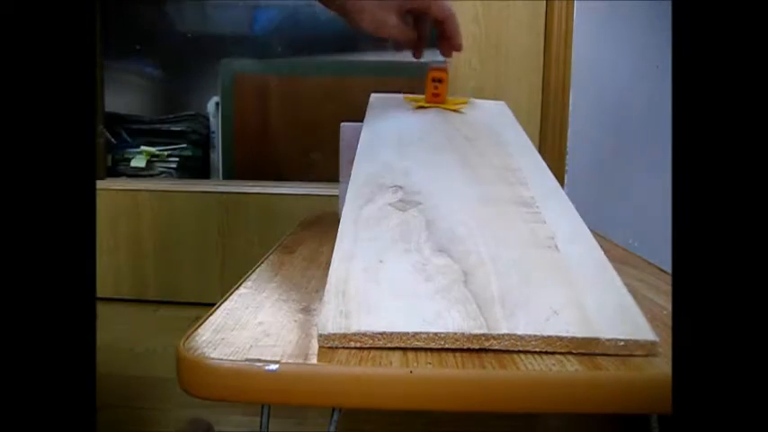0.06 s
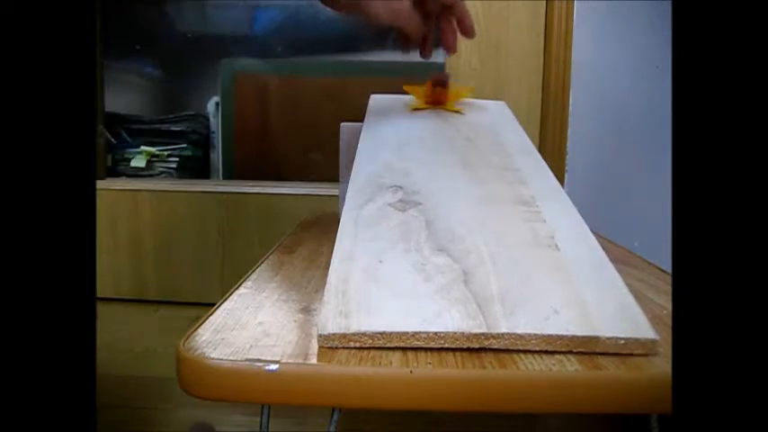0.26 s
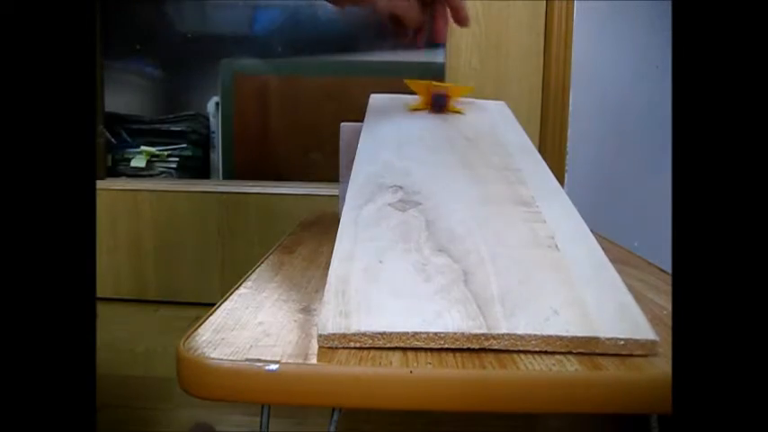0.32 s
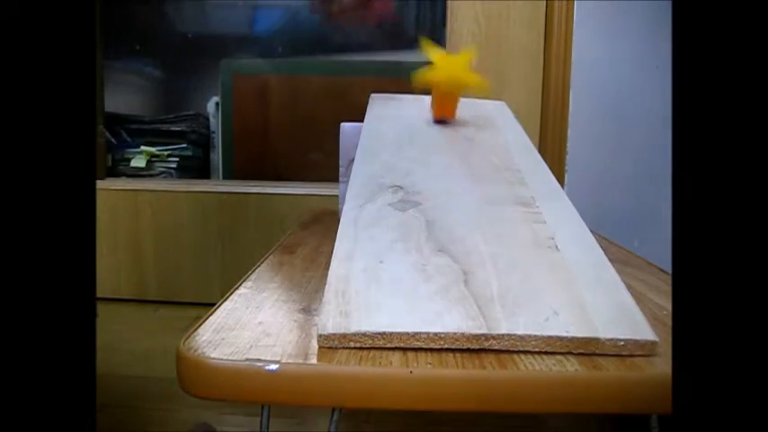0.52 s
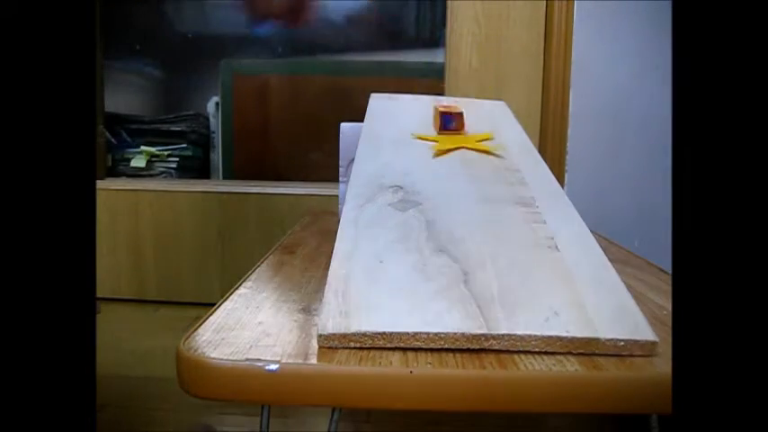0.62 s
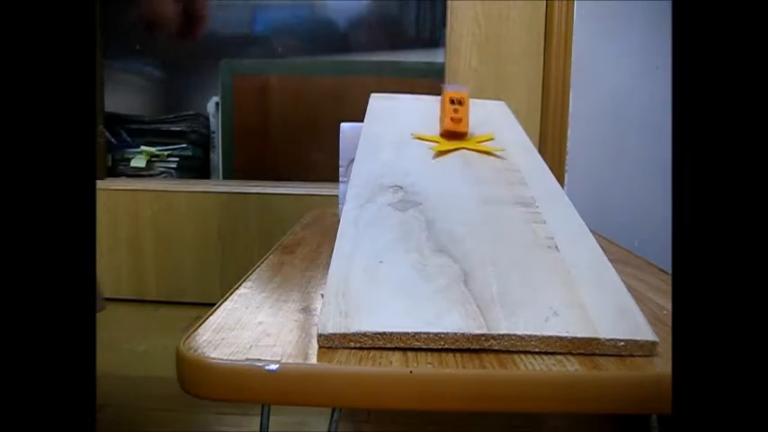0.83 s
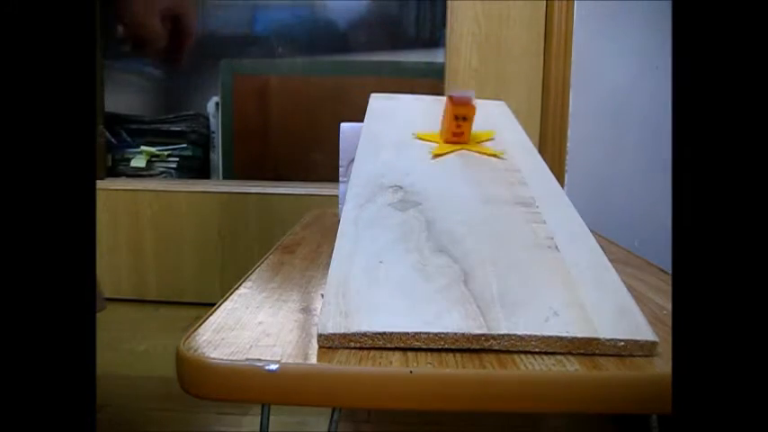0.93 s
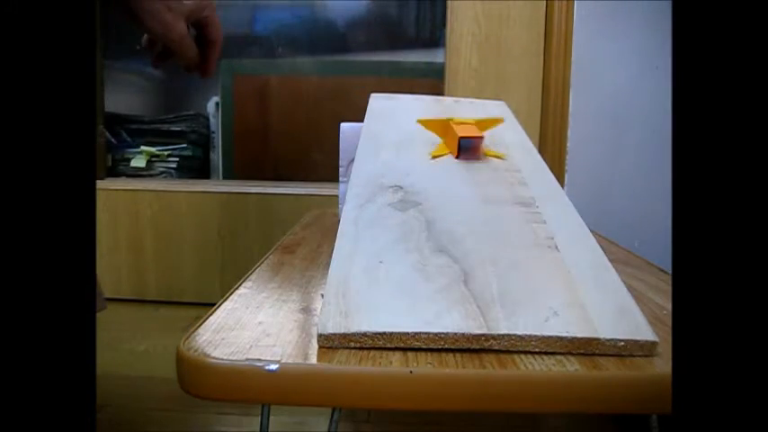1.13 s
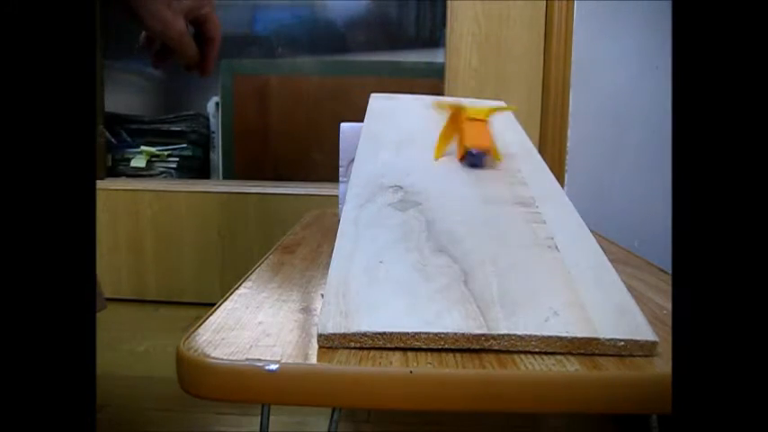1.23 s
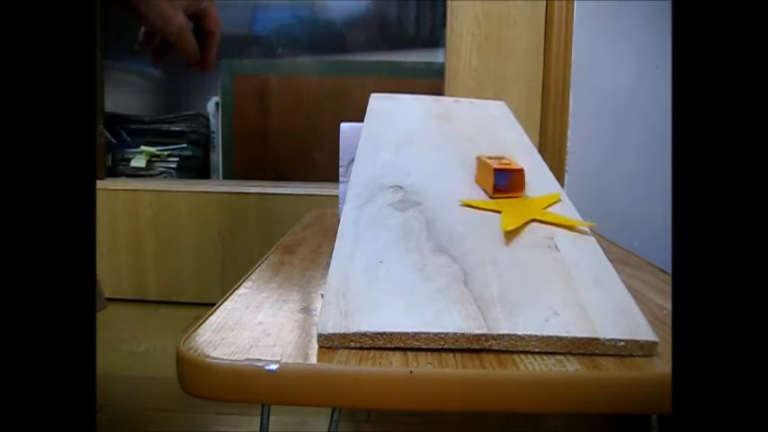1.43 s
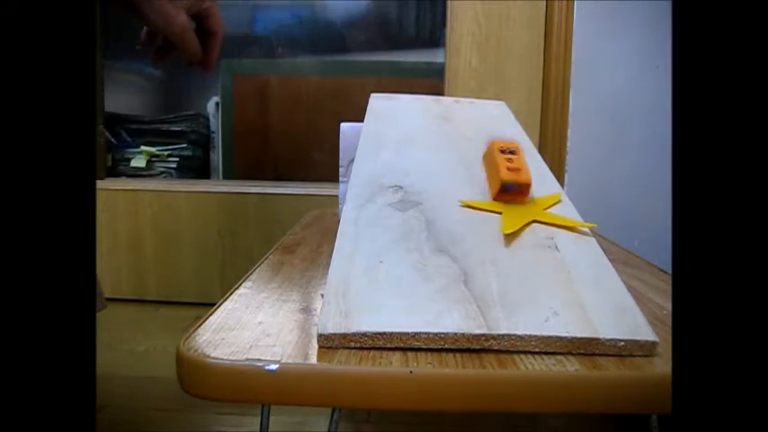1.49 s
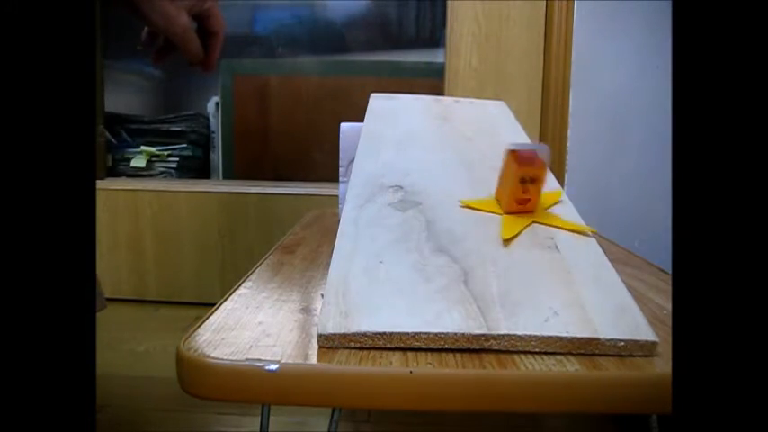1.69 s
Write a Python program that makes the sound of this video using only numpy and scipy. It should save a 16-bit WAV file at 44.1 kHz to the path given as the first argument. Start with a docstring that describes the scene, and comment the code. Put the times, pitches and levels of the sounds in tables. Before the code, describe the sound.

A little plastic toy clatters end over end down a wooden board in two uneven bursts of sharp clicks and woody knocks, with weaker taps and brief scrapes following each. Heard close up in a quiet room with low hum.

```python
"""Toy tumbling down a board

A quiet room, one microphone close to a wooden board. A small plastic toy tumbles down it end over end:
its hard edges click, its body lands and rings the wood, its weight shifts with dull bumps, and between
landings it scrapes a little. Behind it are a short room tail, a low hum and a faint whine."""
import sys
import numpy as np
from scipy import signal
from scipy.fft import rfft, irfft
from scipy.io import wavfile
from scipy.ndimage import map_coordinates

SR = 44100
rng = np.random.default_rng(int(sys.argv[2]) if len(sys.argv) > 2 else 0)


def unload_wav(signal):
    """Save mono or channel-first audio to the path in sys.argv[1] as 16-bit WAV at rate SR, clipped to [-1, 1]."""
    wavfile.write(
        sys.argv[1],
        SR,
        np.round(np.clip(np.atleast_2d(signal).T, -1, 1) * 32767).astype(np.int16),
    )


N = 77175
T = np.arange(N) / SR

# spectrum of the room tone: frequency_hz, gain_db
AIR_SPECTRUM = [(15, 6.5), (25, -10), (117, -2.5), (384, -12), (560, -9.5), (800, -12.5), (1160, -13.5),
                (1500, -14), (4370, -20.5), (11000, -21), (16000, -38)]
# the hum and the whine: centre_hz, width_hz, level_db
HUM_BANDS = [(116.5, 30.3, -49.5), (1318, 102, -55)]
# the room's tail by band: low_hz, high_hz, gain_db, t60_s
ROOM_TAIL = [(97, 350, -4.5, 0.96), (423, 1070, -3.5, 0.15), (1070, 1950, -9, 0.2), (2270, 5300, -10, 0.19),
             (5330, 11700, -9.5, 0.21)]
# the toy slides: start_s, length_s, level_db, treble_db
SLIDES = [(0.125, 0.1, -53, 0), (0.357, 0.042, -39.5, -9), (0.478, 0.21, -47.5, 0.5),
          (0.914, 0.013, -41, -4.5), (1.132, 0.034, -40.5, -9), (1.236, 0.15, -46.5, 7.5),
          (1.385, 0.03, -41, 3.5), (1.676, 0.045, -50.5, 1)]
# spectrum of plastic rubbing on wood: frequency_hz, gain_db
SLIDE_SPECTRUM = [(200, -16), (1000, -7), (3000, 6.5), (6500, -1.5), (11000, -0.5), (13000, -10),
                  (16000, -26)]
# the fingers let go and the toy rocks on the board: start_s, level_db, t60_s
ROCKINGS = [(0.180, -35, 0.062), (0.203, -44.5, 0.071), (0.237, -35, 0.1), (0.363, -44, 0.14),
            (1.229, -41, 0.12), (1.403, -48, 0.28)]
# spectrum of a dull bump: frequency_hz, gain_db
BUMP_SPECTRUM = [(40, -10), (100, -5), (220, 4.5), (320, -7.5), (430, -5.5), (1500, -31), (4000, -84)]
# the body lands, a harder contact having a higher corner: start_s, level_db, corner_hz, low_modes_db
LANDINGS = [(.1795, -42.5, 900, 5.5), (0.2371, -16.5, 2720, -6.5), (.2665, -58, 1430, 16),
            (.291, -48.5, 1190, 20), (.363, -34, 1160, -3), (.4610, -15, 1890, 0.5),
            (.4773, -30.5, 980, -2.5), (.554, -35.5, 1360, -4.5), (.590, -38.5, 1830, -0.5),
            (.630, -35.5, 2390, -2.5), (1.1465, -52, 1000, 1), (1.2285, -20, 1130, -4.5),
            (1.2443, -27.5, 1035, -3.5), (1.407, -32, 1920, -9)]
# where the toy touches along the board: time_s, position_m
TOY_PATH = [(.24, .297), (.46, .373), (1.23, .408), (1.41, .495)]
# the board's main modes: pitch_hz, gain_db, t60_s
BOARD_MODES = [(223, -32, 0.18), (254.3, -21, 0.38), (456, -10.5, 0.24), (492.6, -16, 0.45),
               (639, -14.5, 0.105), (709, -1, 0.11), (791, -8.5, 0.18), (854, -8.5, 0.15), (968, 4.5, 0.11),
               (1024, -11.5, 0.18), (1330, -10, 0.15), (1470, 9.5, 0.054), (1854, -4, 0.075),
               (2122, 12.5, 0.04)]
# spectrum of the board's crowd of weak modes: frequency_hz, gain_db
CROWD_SPECTRUM = [(150, -22), (400, -16.5), (720, 1.5), (1150, -5), (1500, -12), (3300, -0.5), (6000, -6.5),
                  (16000, -42)]
# hard edges tap the wood: start_s, level_db, treble_db, contact_s, pitch_ratio
EDGE_TAPS = [(0.13, -39, -12.5, 0.0075, 1.15), (0.1466, -32, -4.5, 0.0012, 0.98),
             (0.238, -22.5, -22.5, 0.0023, 1.095), (0.3597, -34.5, 0, 0.0032, 0.78),
             (0.4092, -34.5, -3, 0.00066, 0.92), (0.436, -10.5, -2, 0.0007, 1.01),
             (0.447, -22, -8, 0.00066, 1.1), (0.4765, -27.5, -13, 0.0026, 0.89),
             (0.4854, -28.5, -11, 0.0028, 1.05), (.617, -40, -24, 0.0089, .95),
             (0.6285, -34, -32, 0.0036, 1.2), (.6345, -26.5, -16, 0.0023, 1),
             (0.6950, -26.5, -1.5, 0.00177, 1.065), (0.9197, -32, -15, 0.0011, 1.23),
             (1.1463, -21.5, -18, 0.00066, 1.164), (1.179, -34.5, -2, 0.0014, 1.13),
             (1.207, -8, -6, 0.00044, 0.97), (1.2179, -31, -7, 0.0036, 0.98), (1.232, -28, -9, 0.005, 1),
             (1.2439, -25, -9, 0.003, 1.07), (1.2523, -20, -20, 0.0006, 1),
             (1.4030, -28.5, -32, 0.003, 1.5), (1.4067, -21.5, -26, 0.0025, 0.98),
             (1.4635, -27, -5, 0.0038, 1.08), (1.616, -46, -22, 0.0012, 1.42),
             (1.6921, -38.5, -3, 0.00088, 1.1), (1.7042, -37.5, -14, 0.00096, 1.1)]
# modes of the plastic shell: pitch_hz, gain_db, t60_s
SHELL_MODES = [(2747, 6, 0.0046), (3050, 0, 0.012), (3400, -22, 0.0077)]
# spectrum of the plastic's crack: frequency_hz, gain_db
CRACK_SPECTRUM = [(200, -23), (800, -3), (1200, -12.5), (2700, 3.5), (3900, -0.5), (6500, -0.5), (9000, 1),
                  (11000, 6), (13000, -4), (16000, -7.5)]

BEND_WAVELENGTH_M, NODE_DB = .1, 2.5  # board wavelength at 1 kHz; gain on a crest or loss on a node
CROWD_DB, CROWD_T60_S = -3, 0.091  # level relative to the main modes
LOW_MODES_HZ, TREBLE_HZ = 772, 6700  # centres of the bass and treble tilts
CRACK_DB = 4.5  # relative to the shell's ring
SHELL_LOW_HZ = 1120  # the clicks are cut below this


def undb(db):
    """Decibels to amplitude."""
    return 10 ** (np.asarray(db) / 20)


def level(x, db, size=N):
    """Scale x so that its first size samples have the given rms level."""
    return x * undb(db) / np.sqrt(np.mean(x[:size] ** 2) + 1e-18)


def fade(t60):
    """Decay that falls 60 dB in t60 seconds."""
    return np.exp(-np.log(1000) * T / max(t60, 1e-4))


def add(out, start_s, x):
    """Mix x into out from the given time on."""
    i = int(round(max(start_s, 0) * SR))
    out[i:i + len(x)] += x[:N - i]


def butter(x, hz, kind, order=2):
    """Butterworth filter."""
    return signal.sosfilt(signal.butter(order, np.clip(hz, 10, SR * .49), kind, fs=SR, output="sos"), x)


def colour(points, size=4096):
    """Minimum-phase impulse response with a spectrum of (frequency_hz, gain_db) points."""
    hz, db = np.array(points).T
    bins_hz = np.maximum(np.fft.rfftfreq(size, 1 / SR), 1)
    gain = undb(np.interp(np.log(bins_hz), np.log(hz), db))
    cepstrum = irfft(np.log(gain))
    cepstrum[1:size // 2] *= 2
    cepstrum[size // 2 + 1:] = 0
    return irfft(np.exp(rfft(cepstrum)))


def through(x, response):
    """Pass x through an impulse response, keeping its length."""
    return signal.fftconvolve(x, response)[:len(x)]


def ring(modes):
    """Decaying sines of a struck object; neighbouring pairs of modes swing in opposite directions."""
    return sum(undb(db) * fade(t60) * np.sin(2 * np.pi * hz * T) * (-1) ** (k // 2)
               for k, (hz, db, t60) in enumerate(modes))


def brighten(x, treble_db):
    """Tilt that lifts or lowers the treble."""
    tilt = [(TREBLE_HZ / 1.73, 0), (TREBLE_HZ * 1.73, treble_db), (TREBLE_HZ * 2.0, 1.3 * treble_db)]
    return through(x, colour(tilt))


def room_tone():
    """Steady room noise, with two narrow bands for the low hum and the faint whine."""
    out = level(through(rng.standard_normal(N), colour(AIR_SPECTRUM)), db=-48.5)
    for hz, width_hz, db in HUM_BANDS:
        band = butter(rng.standard_normal(N), [hz - width_hz / 2, hz + width_hz / 2], "band")
        out += level(band, db)
    return out


def room_reflections(direct, gap_s=0.0065, early_db=-12, early_t60_s=0.028):
    """The direct sound, quick reflections from the table and furniture, then a short diffuse tail."""
    def echoes(envelope):
        return rng.standard_normal(N) * envelope / np.sqrt(np.sum(envelope ** 2))

    early_rise = np.minimum(T / gap_s, 1)
    tail_rise = np.clip(T / gap_s - 1, 0, 1)
    response = undb(early_db) * echoes(early_rise * fade(early_t60_s))
    for low_hz, high_hz, db, t60 in ROOM_TAIL:
        response += undb(db) * butter(echoes(tail_rise * fade(t60)), [low_hz, high_hz], "band")
    return direct + through(direct, response)


def scrapes(rough_db=4.5, rough_hz=302):
    """Plastic slides over the wood grain with a fine, slightly uneven hiss."""
    out, tone = np.zeros(N), colour(SLIDE_SPECTRUM)
    for start_s, length_s, db, treble_db in SLIDES:
        size = int(length_s * SR)
        roughness = level(butter(rng.standard_normal(N), rough_hz, "low"), 0)
        friction = rng.standard_normal(N) * undb(rough_db * roughness)
        hiss = brighten(through(friction[:size], tone), treble_db)
        add(out, start_s, level(hiss * signal.windows.tukey(size, .5), db))
    return out


def bumps():
    """The toy's weight shifts and shakes the board and table."""
    out, tone, size = np.zeros(N), colour(BUMP_SPECTRUM), SR // 3
    for start_s, db, t60 in ROCKINGS:
        shake = rng.standard_normal(size) * fade(t60)[:size]
        add(out, start_s, level(through(shake, tone), db, size=600))
    return out


def board_knocks():
    """Each landing rings the board; a mode answers most when struck where it swings widest."""
    out, size = np.zeros(N), SR // 2
    crowd_tone = colour(CROWD_SPECTRUM)
    for start_s, db, corner_hz, low_modes_db in LANDINGS:
        wavelengths = np.interp(start_s, *np.array(TOY_PATH).T) / BEND_WAVELENGTH_M
        modes = [(hz, mode_db + NODE_DB * np.cos(4 * np.pi * wavelengths * np.sqrt(hz / 1000)), t60)
                 for hz, mode_db, t60 in BOARD_MODES]
        crowd = through(rng.standard_normal(size) * fade(CROWD_T60_S)[:size], crowd_tone)
        wood = level(ring(modes)[:size], 0, size=800) + level(crowd, CROWD_DB, size=800)
        knock = butter(wood, corner_hz, "low", order=3)  # a softer contact leaves out the high modes
        bass_tilt = colour([(LOW_MODES_HZ / 1.2, low_modes_db), (LOW_MODES_HZ * 1.2, 0)])
        add(out, start_s, level(through(knock, bass_tilt), db, size=800))
    return out


def edge_clicks():
    """A brief rough push drives the plastic's crack and damped ring, pitched by the edge that hits."""
    out, size = np.zeros(N), SR // 10
    shell = np.gradient(ring(SHELL_MODES)[:size])
    for start_s, db, treble_db, contact_s, pitch_ratio in EDGE_TAPS:
        age = T[:size] / contact_s
        contact = rng.standard_normal(size) * age * np.exp(-2 * age)
        push = irfft(np.exp(1j * np.angle(rfft(contact))))[:size // 2]  # phase only: an even spectrum
        crack = colour([(hz * pitch_ratio, gain_db) for hz, gain_db in CRACK_SPECTRUM])
        pitched_shell = map_coordinates(shell, [np.arange(len(crack)) * pitch_ratio])
        plastic = level(pitched_shell, 0, size=130) + level(crack, CRACK_DB, size=130)
        click = butter(through(push, plastic), SHELL_LOW_HZ, "high")
        add(out, start_s, level(brighten(click, treble_db), db, size=130))
    return out


def scene():
    """The tumble close by and the room behind it, in mono."""
    tumble = board_knocks() + bumps() + edge_clicks() + scrapes()
    return (room_reflections(tumble) + room_tone())[None]


def record(dry):
    """The microphone rounds the loudest peaks, has a narrow dip in the treble and cuts the top."""
    ceiling, dip_hz, dip_width_hz, top_hz = .8, 7907, 1980, 15900
    rounded = dry / (1 + (dry / ceiling) ** 6) ** (1 / 6)
    dipped = signal.lfilter(*signal.iirnotch(dip_hz, dip_hz / dip_width_hz, fs=SR), rounded)
    return signal.sosfilt(signal.ellip(8, .2, 80, top_hz, fs=SR, output="sos"), dipped)


dry = scene()
out = record(dry)
unload_wav(out)
```